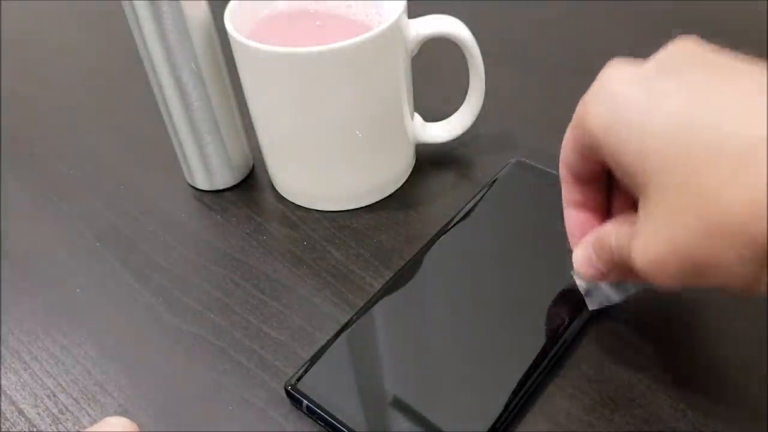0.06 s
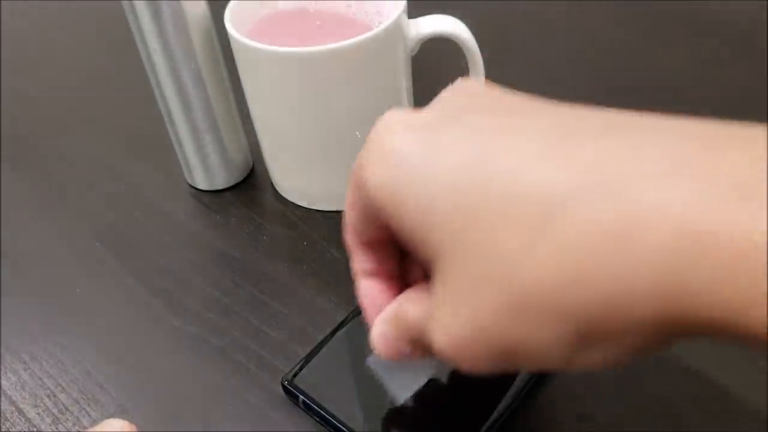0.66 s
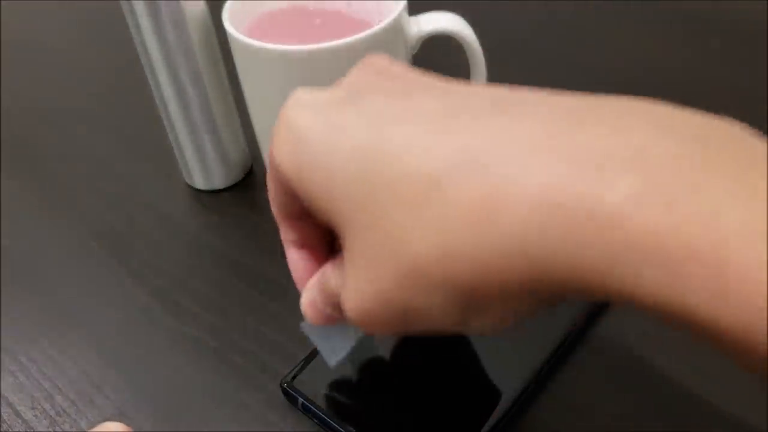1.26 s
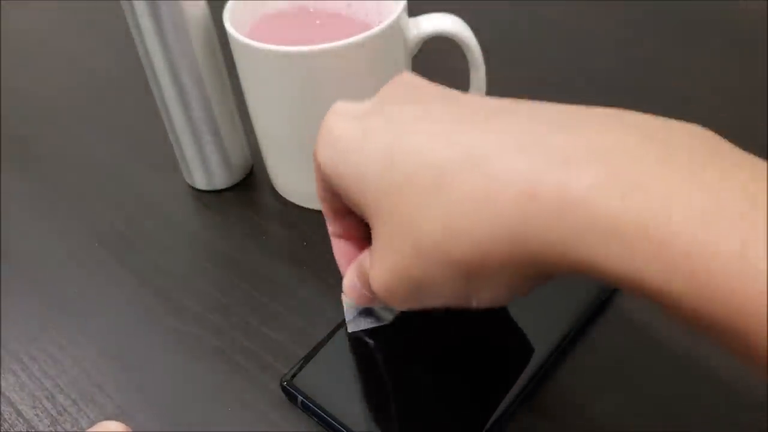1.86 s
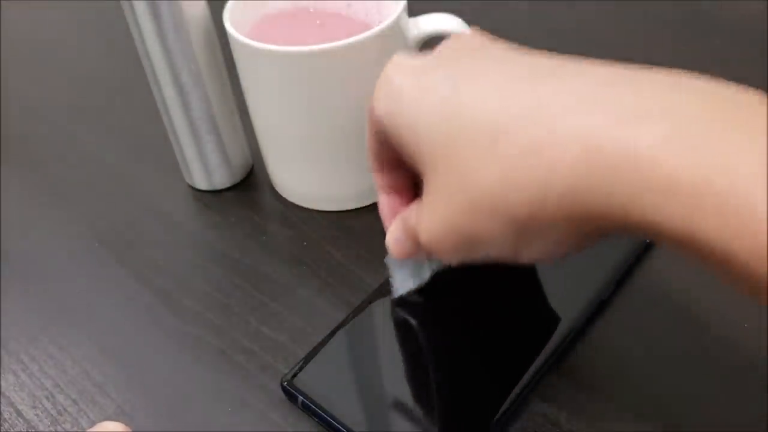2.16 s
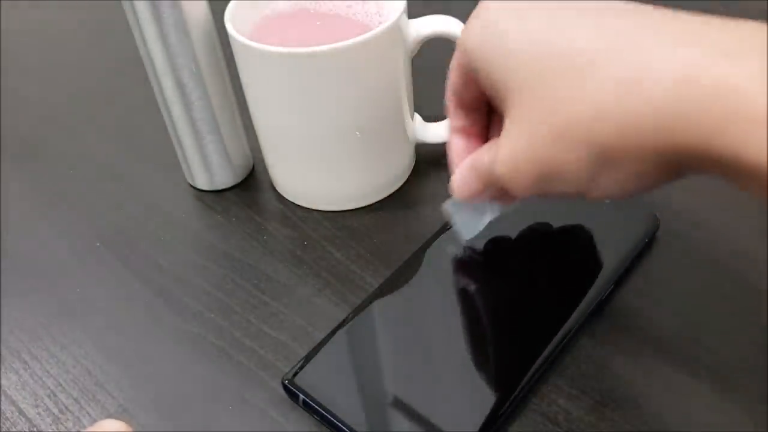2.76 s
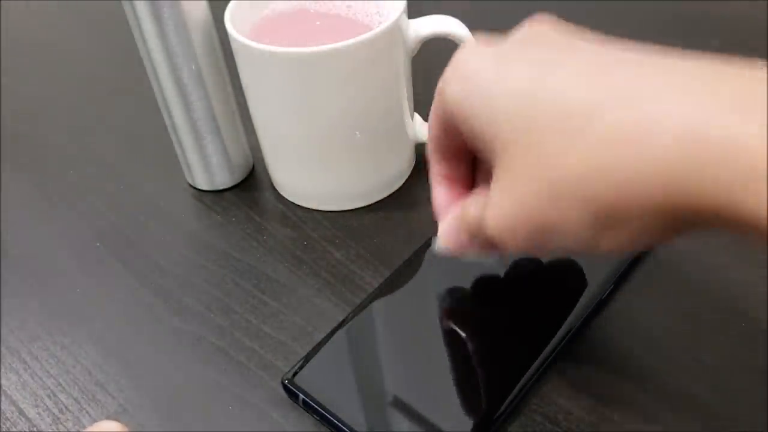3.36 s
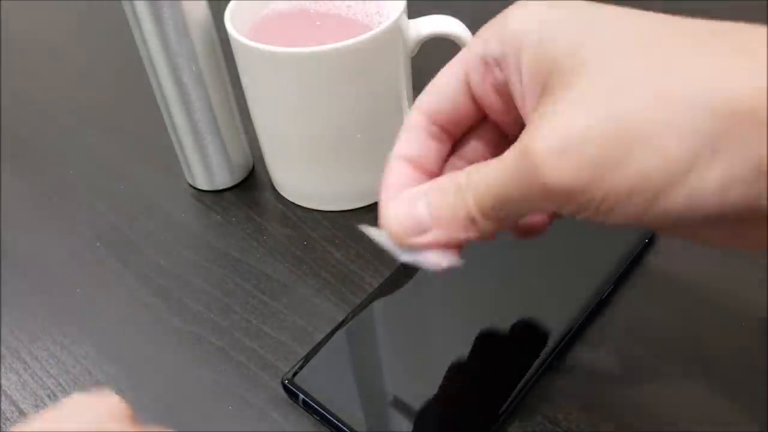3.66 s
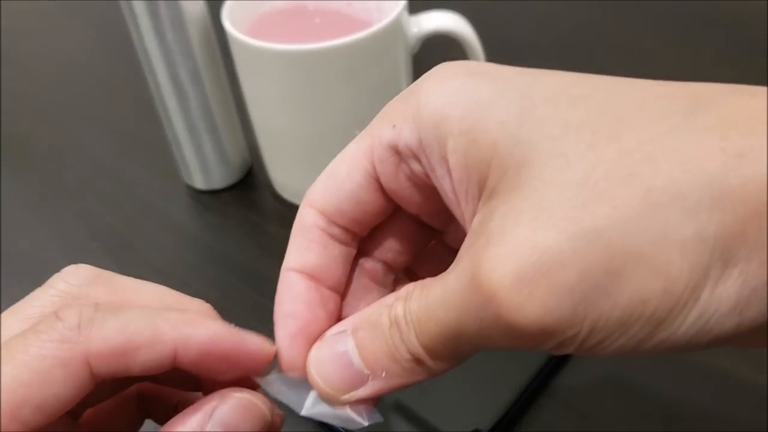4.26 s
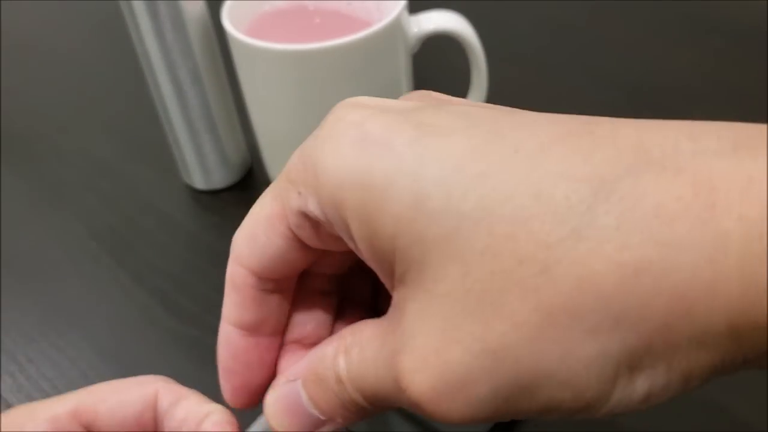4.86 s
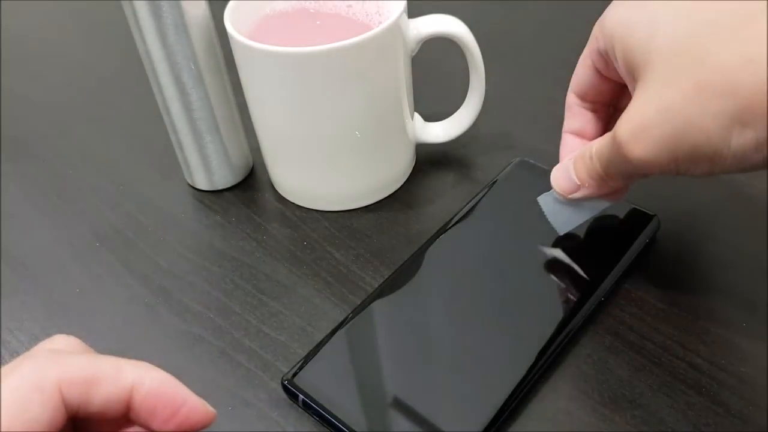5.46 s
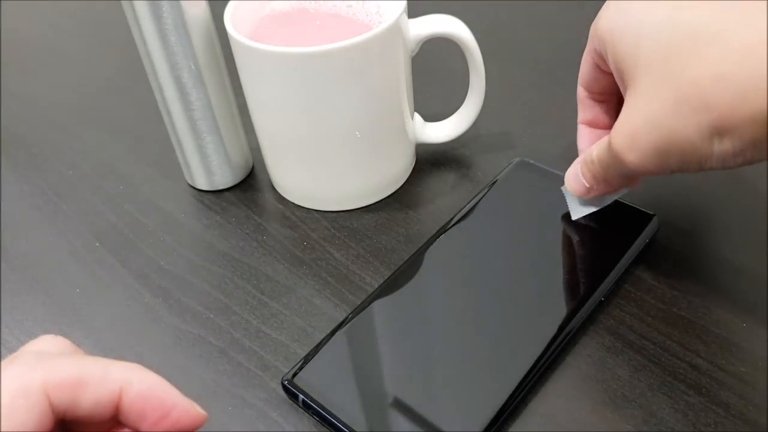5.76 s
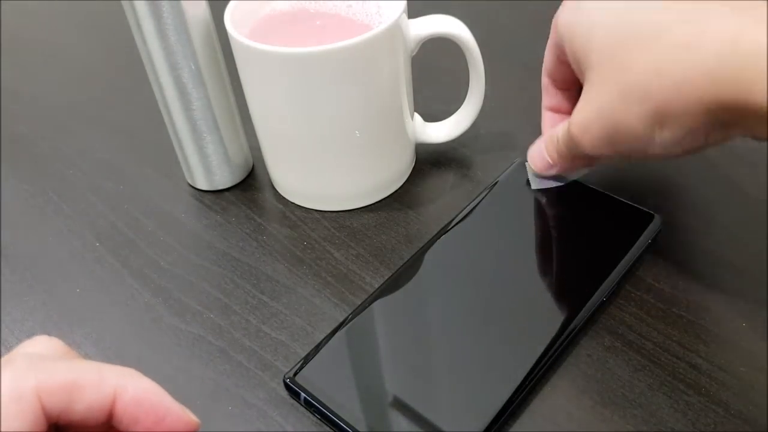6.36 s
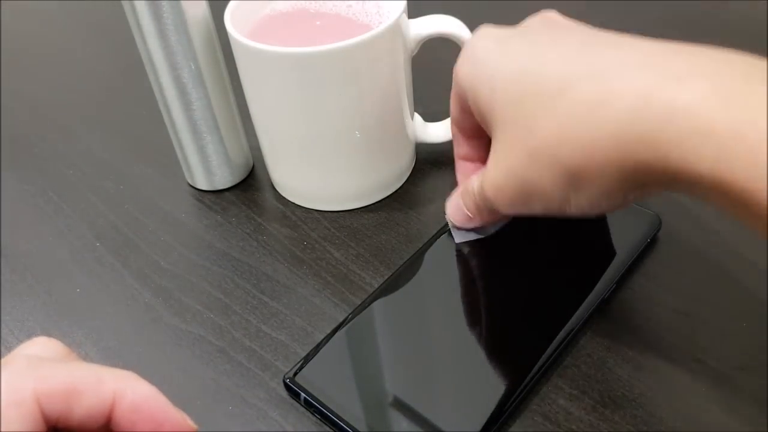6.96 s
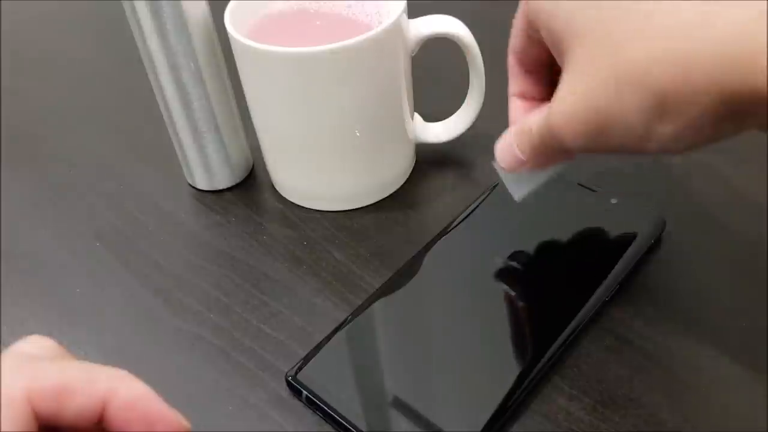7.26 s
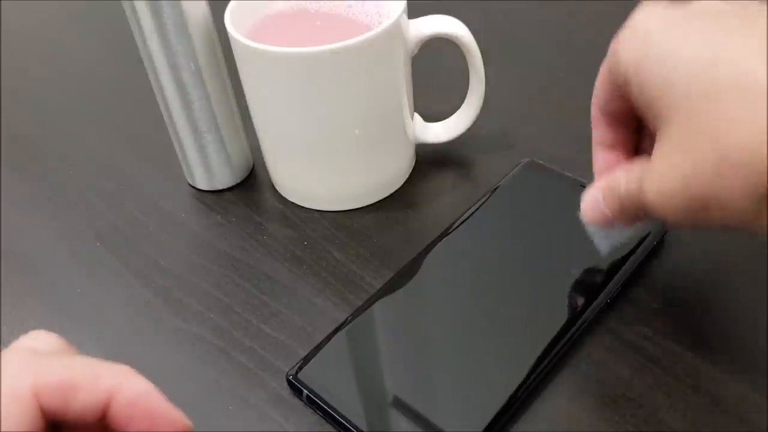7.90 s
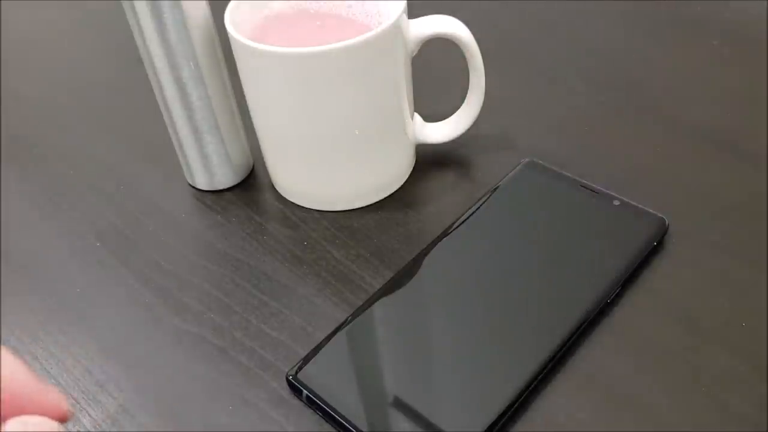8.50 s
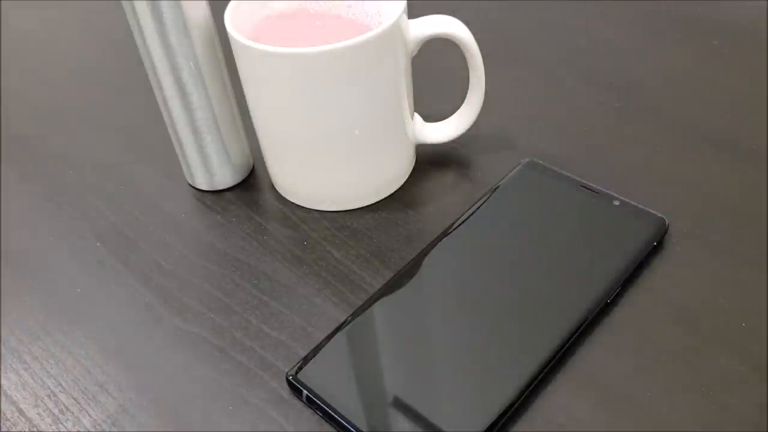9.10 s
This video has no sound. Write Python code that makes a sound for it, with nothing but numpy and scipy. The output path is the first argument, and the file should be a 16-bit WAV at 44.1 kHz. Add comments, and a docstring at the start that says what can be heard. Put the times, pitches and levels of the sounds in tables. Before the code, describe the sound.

Folded sticky tape is dabbed on a phone's glass screen and pulled off again and again, making quick, crisp clicks and tiny crackles, with soft thuds through the wooden desk. In a short pause fingers rub faintly on the tape, then it cracks sharply with a light knock. The dabbing resumes, and a hand softly brushes the desk near the end. The stereo microphones are close, in a small bare room with a low hum.

```python
"""Sticky tape on a phone's glass

A small bare room with a low hum, a stereo pair close to a phone on a wooden desk. Folded sticky tape
is dabbed on the glass and pulled off: the bent film pops, the glue lets go in tiny bursts of crackle,
and the pressing finger thuds softly through the desk. The room answers every snap. In a pause the
fingers shift their grip on the tape; near the end a hand brushes the desk."""
import sys
import numpy as np
from scipy import signal
from scipy.fft import rfft, irfft, next_fast_len
from scipy.io import wavfile
from scipy.ndimage import map_coordinates

SR = 44100
rng = np.random.default_rng(int(sys.argv[2]) if len(sys.argv) > 2 else 0)


def dump_mix(stems):
    """Bounce the given channels to the path in sys.argv[1] as a 16-bit WAV at rate SR."""
    frames = np.atleast_2d(stems).T  # one column per channel
    limited = np.clip(frames, -1, 1)  # hard clip at full scale
    pcm = np.round(limited * 32767).astype(np.int16)
    wavfile.write(sys.argv[1], SR, pcm)


N = 402959
SNAP_T = (np.arange(2048) - 512) / SR  # time around one snap, s; it breaks at 0

# Levels in the tables are relative; the functions add their own gains.
# rumble and hiss of the empty room: f/Hz, level/dB
AIR_SPECTRUM = [(20, -15), (45, -9.5), (70, -16), (120, -8), (200, -16), (340, -19.5), (450, -23.5),
                (600, -24.5), (900, -31.5), (2000, -37), (5000, -38.5), (9500, -41), (12000, -36.5),
                (15600, -39.5), (17000, -52.5)]
# bands of the hum: f/Hz, level/dB, width/Hz
HUM_BANDS = [(122.6, -70, 16), (357, -79, 10)]
# how alike the room sounds at the two microphones: f/Hz, correlation
MIC_COHERENCE = [(60, 0.99), (150, 0.83), (350, 0.78), (700, 0.42), (1400, -0.18), (3000, 0),
                 (10000, -0.13)]
# decay of the reverberation: f/Hz, t60/s
REVERB_DECAY = [(200, 0.68), (600, 0.31), (1400, 0.34), (3700, 0.39), (7500, 0.48), (15000, 0.31)]
# colour of the reverberation: f/Hz, level/dB
REVERB_SPECTRUM = [(200, 1.5), (900, 6), (2000, 1), (4000, 0.5), (8000, -4.5), (15000, -1.5)]
# a hand brushing the desk: f/Hz, level/dB
BRUSH_SPECTRUM = [(100, -9), (350, 1.5), (900, 1), (1700, -7.5), (2600, -15.5), (4200, -15.5), (7000, -26),
                  (16000, -37.5)]
# skin rubbing on tape: f/Hz, level/dB
RUB_SPECTRUM = [(500, -37.5), (2200, -24), (3500, -7), (5500, -1.5), (7600, 0), (9000, -6), (12000, 0.5),
                (16000, -8.5)]
# the tape slides between the fingers: t/s, length/s, level/dB, rasp's starting f/Hz
GRIP_SLIDES = [(3.853, .13, -70.5, 8000), (4.134, .03, -68, 7200), (4.479, .25, -62, 7600),
               (5.79, .15, -77, 4300), (8.367, 0.1, -59.5, 6500)]
# low modes of phone and desk: f/Hz, level/dB, t60/s
THUD_MODES = [(124.6, -4, 0.19), (141.7, -2, 0.14), (168.7, -7, 0.19), (208.6, -11.5, .08)]
# their higher modes: f/Hz, level/dB, t60/s
KNOCK_MODES = [(286, 2, 0.11), (348, -1.5, 0.17), (423.6, -0.5, 0.088), (497, -2.5, 0.076),
               (623, -8, 0.059)]
# modes of the phone's case: f/Hz, level/dB, t60/s
CLACK_MODES = [(698.4, -2, 0.15), (786, -0.5, .1), (1050, -4.5, .06), (1100, -8.5, .05), (1600, -1, 0.055)]
# the finger bumps the phone on the desk: t/s, thud/dB, knock/dB, clack/dB
FINGER_BUMPS = [(0.472, -44.5, -46.5, -59), (2.177, -46.5, -64, -59), (4.755, -42, -55, -37),
                (5.082, -57, -61, -47), (6.03, -62.5, -60.5, -70), (7.088, -38.5, -55, -77),
                (8.065, -41.5, -47, -62), (8.485, -48.5, -55.5, -50)]
# where the hand holds the tape in front of the pair: t/s, left over right/dB
HAND_PAN = [(0, 0), (4.7, 3.5), (5.1, 5.5), (6.4, 0.5), (7.1, 5), (8.1, 3), (8.45, -6.5), (8.7, -3.5),
            (9.1, 1.5)]
# colour of the crackling film: f/Hz, level/dB
FILM_SPECTRUM = [(150, -21), (600, -18), (1000, -12.5), (1300, -12), (1800, -4.5), (2900, -2), (4500, 1),
                 (5900, -1), (7600, 3), (9100, -6), (11800, -1.5), (15500, -5), (17000, -22)]
# resonances of the film clinging to the glass: f/Hz, level/dB
STUCK_RESONANCES = [(1060, 1.5), (1790, 4.5), (2500, 1.5), (3500, 2.5)]
# the bent film pops: t/s, level/dB, body/dB, treble/dB, fold resonance f/Hz
FILM_POPS = [(-0.1, -32, 3.5, 1, 3930), (0.122, -55, -26, -13, 4480), (0.17, -56, -14, 2.5, 4500),
             (0.2368, -45, 3.5, 1, 4830), (0.439, -53.5, 5, -11, 3670), (0.4751, -30.5, -9.5, -8, 3350),
             (0.515, -26.5, -15, -0.5, 3040), (0.8306, -44.5, -1.5, -7, 6000),
             (0.8589, -38.5, -8.5, -1, 5560), (1.1245, -50, 2, -7, 6590), (1.148, -31, -10.5, 7, 6370),
             (1.193, -33.5, -10, -0.5, 2400), (1.405, -45, -2.5, 2, 8000), (1.4232, -33, -6.5, 5, 7060),
             (1.6536, -37, -2, -3.5, 2300), (1.7159, -30.5, -7.5, -2, 2640),
             (1.8851, -36.5, -2.5, -4, 2160), (1.9577, -37, -9, 3.5, 1840), (2.1315, -39, 2, -4.5, 2580),
             (2.1709, -38, -9, 2, 3600), (2.2022, -41.5, -10, -7, 3500), (2.4492, -32.5, -7, -9, 7600),
             (2.62, -31.5, -13, -6, 4300), (2.6506, -43.5, -13, -4, 7080), (2.6834, -29, -21, -1.5, 5600),
             (2.9697, -32.5, -1, -4, 5630), (2.9964, -47, -7.5, 3, 2550), (3.0502, -35.5, -6, -5, 2550),
             (3.0715, -36, -13, 2.5, 6900), (3.35, -60.5, -9.5, -5, 7100), (4.168, -62, -16.5, 7.5, 3960),
             (4.493, -56, -25, -2.5, 3400), (4.717, -64, -13, 6, 3470), (4.7385, -43, -11, -12, 1750),
             (4.7644, -33, -16, -5, 3850), (4.799, -40, -9, -2, 7000), (4.898, -58, -1, -6, 1990),
             (4.928, -49.5, -7, -4, 6200), (5.0833, -36, 0.5, 0, 5370), (5.81, -66.5, -3, -14, 2920),
             (5.854, -64.5, 1.5, -16, 3420), (5.9925, -58.5, -13, 0.5, 4500),
             (6.0291, -44.5, -5.5, 0.5, 4100), (6.4354, -35, -14, -0.5, 2035),
             (6.441, -43.5, -12, 6.5, 4700), (6.457, -45, -4, -9, 2030), (6.7684, -49, -5, -10, 6700),
             (6.801, -38.5, -18, -9, 4260), (6.836, -44.5, -13, -7, 2960), (6.887, -48, -2.5, -11, 3450),
             (7.0679, -37.5, -15.5, -13, 4460), (7.0725, -41.5, -17, 0.5, 7100),
             (7.46, -52.5, -16, -17.5, 6500), (7.496, -50.5, -30, -12, 4320), (7.708, -59, -12, -14, 2720),
             (7.7372, -34.5, -10.5, -6.5, 2260), (8.0623, -36, -17, -10, 1640), (8.0746, -33, -17, 8, 1830),
             (8.112, -32, -10, 2.5, 4650), (8.4564, -40.5, -10.5, 3.5, 5200),
             (8.4883, -43.5, 2.5, -28, 3040), (8.619, -50.5, -10, -6, 7080), (8.652, -45.5, -14, 7.5, 6050),
             (8.7125, -37.5, -17, 4, 2310), (9.122, -30.5, -11, 7, 7500)]
# the glue peels and the freed phone rocks: t/s, level/dB, length/s, body/dB, treble/dB, thud/dB
GLUE_PEELS = [(0.462, -40, .005, -7, 1.5, -47), (0.5354, -30, 0.0028, -2, -5, -50),
              (0.933, -39, 0.0051, -3, -1.5, -52.5), (1.207, -31, 0.0046, -5, -4.5, -48),
              (1.4765, -33.5, 0.01, -4, -3.5, -66), (1.7296, -33.5, .0025, -12, -3, -50),
              (1.967, -36.5, 0.0036, -6, 2.5, -46), (2.225, -29.5, .004, -4.5, -1.5, -47.5),
              (2.462, -28.5, 0.0061, -14, 1.5, -41.5), (2.687, -26.5, 0.0071, -13.5, -4, -40.5),
              (2.9489, -34, 0.0046, -6, -8.5, -52), (3.058, -26.5, .0028, -12, -4.5, -41.5),
              (6.5287, -39, 0.0013, -6.5, -4, -47), (6.7862, -37, 0.0016, -23, -4, -42),
              (7.143, -35, 0.002, -11, -0.5, -46), (7.515, -44, 0.0084, -16, 0.5, -51),
              (7.7867, -33, 0.0024, -1, 1, -41.5), (8.1226, -33.5, 0.0028, -4, 4.5, -42)]


def amp(db):
    """Decibels to gain."""
    return 10 ** (np.asarray(db) / 20)


def unit(x):
    """Scaled to rms 1."""
    return x / np.sqrt(np.mean(x ** 2) + 1e-20)


def along(points, hz):
    """(f/Hz, value) points read on a log axis."""
    f, v = np.transpose(points)
    return np.interp(np.log(hz + 1), np.log(f + 1), v)


def wobble(rate):
    """A smooth random curve, rate knots a second."""
    return map_coordinates(rng.standard_normal(int(N * rate / SR) + 4), [np.arange(N) * rate / SR])


def fuzzy_tone(hz, width):
    """Narrow noise of rms 1 around a steady or moving pitch."""
    phase = 2 * np.pi * np.cumsum(hz * np.ones(N)) / SR
    return unit(wobble(width) * np.sin(phase) + wobble(width) * np.cos(phase))


def filtered(x, response):
    """x through a filter whose gain is response(hz)."""
    size = next_fast_len(N + SR // 4)
    return irfft(rfft(x, size) * response(np.fft.rfftfreq(size, 1 / SR)), size)[..., :N]


def causal(db):
    """The response with this dB spectrum that rings only after its blow."""
    cepstrum = irfft(db * np.log(10) / 20)
    half = len(cepstrum) // 2
    return np.exp(rfft(np.r_[cepstrum[0], 2 * cepstrum[1:half], np.zeros(half)]))


def add(track, s, sound):
    """Mix a sound into the track at time s."""
    start = round(s * SR)
    a, b = max(start, 0), min(start + sound.shape[-1], N)
    if b > a:
        track[:, a:b] += sound[..., a - start:b - start]


def diffuse(pair, hz):
    """Two unrelated spectra become a diffuse field at the microphones, near mono in the bass."""
    turn = np.arccos(np.clip(along(MIC_COHERENCE, hz), -1, 1)) / 2
    mid, side = pair[0] * np.cos(turn), pair[1] * np.sin(turn)
    return np.array([mid + side, mid - side])


def background(air_db, hum_db):
    """Rumble and faint hiss all around the pair, with a wavering hum in the centre."""
    hz = np.fft.rfftfreq(next_fast_len(N), 1 / SR)
    noise = diffuse(rng.standard_normal((2, len(hz), 2)) @ [1, 1j], hz)
    air = irfft(noise * amp(along(AIR_SPECTRUM, hz)))[:, :N]
    hum = sum(amp(db) * fuzzy_tone(pitch, width) for pitch, db, width in HUM_BANDS)
    return amp(air_db) * unit(air) + amp(hum_db) * hum


def reverb(sound, build_s, size=256):
    """The bare room's answer: a diffuse tail in which each frequency dies at its own speed."""
    hz = np.fft.rfftfreq(size, 1 / SR)[:, None]
    t = np.arange(SR // size) * size / 2 / SR
    noise = diffuse(rng.standard_normal((2, len(hz), len(t), 2)) @ [1, 1j], hz)
    decay = amp(along(REVERB_SPECTRUM, hz) - 60 * t / along(REVERB_DECAY, hz))
    build = 1 - np.exp(-t / build_s)
    tail = signal.istft(noise * decay * build, nperseg=size)[1]
    tail /= np.sqrt(np.sum(tail ** 2) / 2)
    return signal.fftconvolve(sound, tail, axes=1)


def stroke(s, attack_s, hold_s, db_per_s, release_s):
    """Gain of a hand's stroke: it sets in, swells or fades while held, and dies away."""
    t = np.arange(N) / SR - s
    attack = np.clip(t / attack_s, 0, 1)
    release = np.exp(-np.maximum(t - hold_s, 0) / release_s)
    return attack * amp(db_per_s * np.clip(t, 0, hold_s)) * release


def friction(spectrum, grain_db, grain_rate):
    """Stereo rubbing noise of rms 1; grain_db above 0 breaks it into tiny slips."""
    slips = amp(grain_db * wobble(grain_rate)) * rng.standard_normal((2, N))
    return unit(filtered(slips, lambda hz: amp(along(spectrum, hz))))


def desk_brush(s, level_db):
    """A hand brushes the desk once: a smooth, dull swish."""
    sweep = stroke(s, attack_s=.0029, hold_s=.09, db_per_s=-121.5, release_s=.047)
    return amp(level_db) * sweep * friction(BRUSH_SPECTRUM, grain_db=0, grain_rate=340)


def finger_slides(rub_db, rasp_db, sag_hz_per_s=7500):
    """Fingers slide on the tape, which rasps louder and lower as more of it comes free."""
    t, grip, pitch = np.arange(N) / SR, np.zeros(N), np.zeros(N)
    for s, length, db, start_hz in GRIP_SLIDES:
        grip += amp(db) * stroke(s, attack_s=.049, hold_s=length, db_per_s=27.5, release_s=.017)
        pitch = np.where(t >= s, start_hz - sag_hz_per_s * np.minimum(t - s, length), pitch)
    rasp = np.array([fuzzy_tone(pitch, width=1300) for mic in range(2)])
    rasp *= amp(4.4 * wobble(250))  # the level flickers
    rub = friction(RUB_SPECTRUM, grain_db=2.5, grain_rate=240)
    return grip * (amp(rub_db) * rub + amp(rasp_db) * unit(rasp))


def ring(modes, attack_s, detune):
    """Damped modes, struck at new strengths each time and detuned a little by the finger's load."""
    t = np.arange(SR // 3) / SR
    tone = np.zeros(len(t))
    for hz, db, t60 in modes:
        strength, load = rng.standard_normal(2)
        decay = amp(db + 2 * strength - 60 * t / t60)
        tone += decay * np.sin(2 * np.pi * hz * (1 + detune * load) * t)
    return tone * (1 - np.exp(-t / attack_s))


def phone_bumps(thud_gain_db, clack_gain_db, rebound_knock_db, rebound_clack_db, room_db):
    """Bumps and rebounds sound through the desk; the fuller a peel, the harder the case clacks."""
    out = np.zeros((2, N))
    rebounds = [(s, thud_db, thud_db + rebound_knock_db, db + body_db + rebound_clack_db)
                for s, db, _, body_db, _, thud_db in GLUE_PEELS]
    for s, thud_db, knock_db, clack_db in FINGER_BUMPS + rebounds:
        thud = amp(thud_db + thud_gain_db) * ring(THUD_MODES, attack_s=.0098, detune=.038)
        knock = amp(knock_db) * ring(KNOCK_MODES, attack_s=.003, detune=.03)
        clack = amp(clack_db + clack_gain_db) * ring(CLACK_MODES, attack_s=.00071, detune=.029)
        blow = thud + knock + clack
        add(out, s, blow)
        add(out, s, amp(room_db) * reverb(blow[None], build_s=.0024))
    return out


def desk_push(s, level_db, width_s):
    """At the hardest bump the phone's weight gives the desk one low push."""
    u = (np.arange(N) / SR - s) / width_s
    return amp(level_db) * (1 - u ** 2) * np.exp(-u ** 2 / 2)


def crackle(length_s, spiky_db, alike, swell_db, swell_s):
    """A faint, soft swell surrounds a short burst of crackle; the microphones hear it partly alike."""
    t = SNAP_T
    spikes = amp(spiky_db * np.repeat(rng.standard_normal(len(t) // 8), 8))
    crack = (t >= 0) * np.exp(-.5 * (abs(t) / length_s) ** 1.21)
    swell = amp(swell_db) * np.exp(-abs(t) / swell_s)
    common, left, right = rng.standard_normal((3, len(t)))
    noise = np.sqrt(alike) * common + np.sqrt(1 - alike) * np.array([left, right])
    burst = (crack + swell) * spikes * noise
    return burst / np.linalg.norm(burst, axis=1, keepdims=True)


def film_colour(hz, body_db, treble_db, folds, log_width=.14, ripple_db=2, knots=64):
    """The film's spectrum in dB: its folds' resonances, and lesser ones that shift with every bend."""
    tilt = along([(1200, body_db + 9.5), (2800, .0082), (7000, .0048), (10500, treble_db + 3)], hz)
    peaks = sum(db / (1 + (np.log((hz + 1) / centre) / log_width) ** 2) for centre, db in folds)
    lesser = map_coordinates(rng.standard_normal(knots + 1), [np.sqrt(hz / hz[-1]) * knots])
    return along(FILM_SPECTRUM, hz) + tilt + peaks + ripple_db * lesser


def snap(s, burst, body_db, treble_db, folds, room_db, lag_s):
    """A burst of crackle rings in the film at the hand's place, with its own answer from the room."""
    size = burst.shape[1]
    hz = np.fft.rfftfreq(size, 1 / SR)
    colour = causal(film_colour(hz, body_db, treble_db, folds))
    # every spot on the screen lies at another distance from the two microphones
    sides = np.array([[1], [-1]])
    arrival = np.exp(1j * np.pi * hz * lag_s * rng.standard_normal() * sides)
    direct = irfft(rfft(burst) * colour * arrival)
    pan_db = np.interp(s, *np.transpose(HAND_PAN))
    sound = amp(room_db) * reverb(direct, build_s=.0019)
    sound[:, :size] += direct * amp(sides * pan_db / 2)
    return sound


def crinkles(sliding_db, bending_db, thread_db, spread_db, lead_s=.075, trail_s=.018):
    """Faint ticks: the film slides, it bends before a peel, and stray glue threads break after one."""
    out = np.zeros((2, N))
    sliding = [(s + length * rng.random(), db + sliding_db)
               for s, length, db, _ in GRIP_SLIDES for _ in range(3)]
    bending = [(s - lead_s * (1 + rng.random() / 2), bending_db) for s, *_ in GLUE_PEELS]
    threads = [(s + trail_s * rng.random(), db + thread_db)
               for s, db, *_ in GLUE_PEELS for _ in range(2)]
    for s, db in sliding + bending + threads:
        burst = crackle(length_s=.0016, spiky_db=3, alike=.5, swell_db=-20, swell_s=.002)
        gain = amp(db + spread_db * rng.standard_normal())
        tick = snap(s, burst, body_db=-9, treble_db=-5, folds=STUCK_RESONANCES,
                    room_db=-3.5, lag_s=.00012)
        add(out, s + SNAP_T[0], gain * tick)
    return out


def crease(s, gain_db, fold_hz, fold_db):
    """The tape's stiff crease snaps through once: a very short, bright crack."""
    out = np.zeros((2, N))
    burst = crackle(length_s=.0013, spiky_db=4, alike=.57, swell_db=-27, swell_s=.0022)
    crack = snap(s, burst, body_db=-15.5, treble_db=8, folds=[(fold_hz, fold_db)],
                 room_db=-9.5, lag_s=.00005)
    add(out, s + SNAP_T[0], amp(gain_db) * crack)
    return out


def film_pops(gain_db, fold_db):
    """The bent film gives single brief cracks as it lands, flexes or is handled."""
    out = np.zeros((2, N))
    for s, db, body_db, treble_db, fold_hz in FILM_POPS:
        burst = crackle(length_s=.0016, spiky_db=3, alike=.6, swell_db=-18.5, swell_s=.0024)
        pop = snap(s, burst, body_db, treble_db, [(fold_hz, fold_db)], room_db=-4.5, lag_s=.00012)
        add(out, s + SNAP_T[0], amp(db + gain_db) * pop)
    return out


def glue_peels(gain_db):
    """The glue lets go of the glass in a burst of crackle that rings the clinging film."""
    out = np.zeros((2, N))
    for s, db, length_s, body_db, treble_db, _ in GLUE_PEELS:
        burst = crackle(length_s, spiky_db=3.5, alike=.62, swell_db=-12.5, swell_s=.002)
        peel = snap(s, burst, body_db, treble_db, STUCK_RESONANCES, room_db=-8, lag_s=.00013)
        add(out, s + SNAP_T[0], amp(db + gain_db) * peel)
    return out


def scene():
    """Phone, tape and hands close to the microphones, the room behind them."""
    phone = phone_bumps(thud_gain_db=-1, clack_gain_db=-11.5, rebound_knock_db=-11.5,
                        rebound_clack_db=-15, room_db=-7)
    phone += desk_push(s=4.755, level_db=-43, width_s=.0018)
    tape = film_pops(gain_db=28, fold_db=6.5) + glue_peels(gain_db=28.5)
    tape += crinkles(sliding_db=22, bending_db=-42.5, thread_db=12.5, spread_db=3.5)
    tape += crease(s=4.7573, gain_db=.5, fold_hz=7150, fold_db=11.5)
    hands = finger_slides(rub_db=-3.5, rasp_db=-6.5) + desk_brush(s=8.918, level_db=-52.5)
    return phone + tape + hands + background(air_db=-67, hum_db=-2.5)


def record(dry):
    """The recorder cuts off steeply at its band limit."""
    top_hz = 16300
    return filtered(dry, lambda hz: 1 / np.sqrt(1 + (hz / top_hz) ** 120))


dry = scene()
out = record(dry)
dump_mix(out)
```